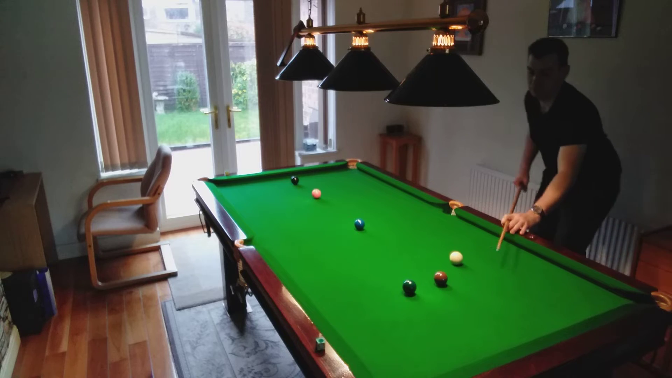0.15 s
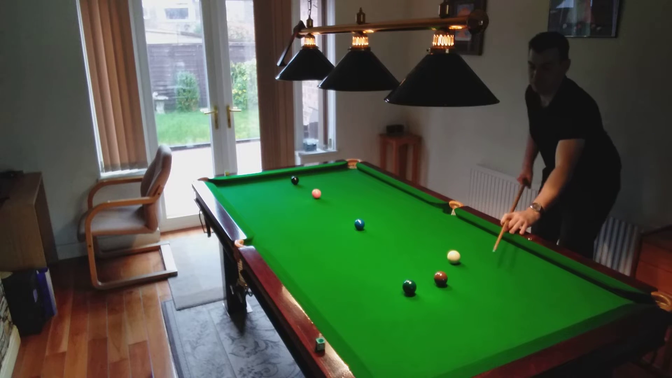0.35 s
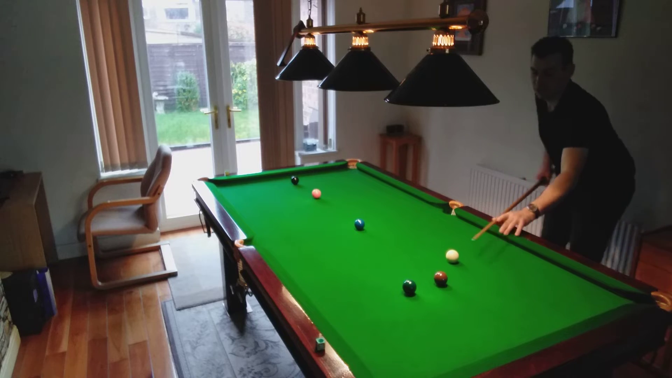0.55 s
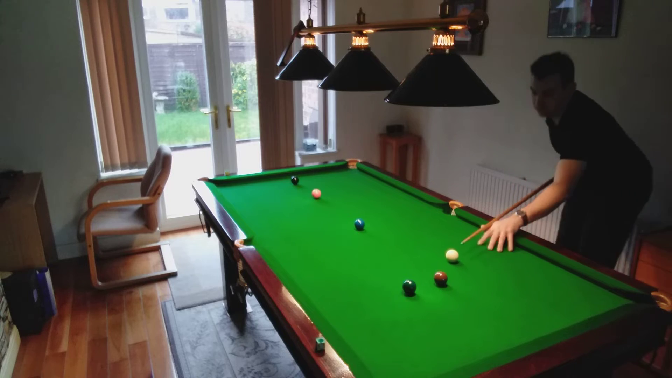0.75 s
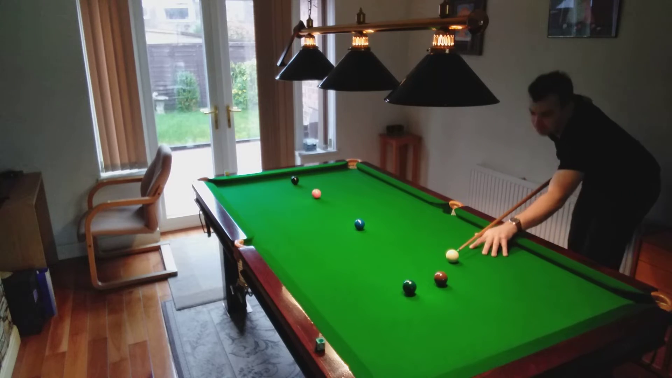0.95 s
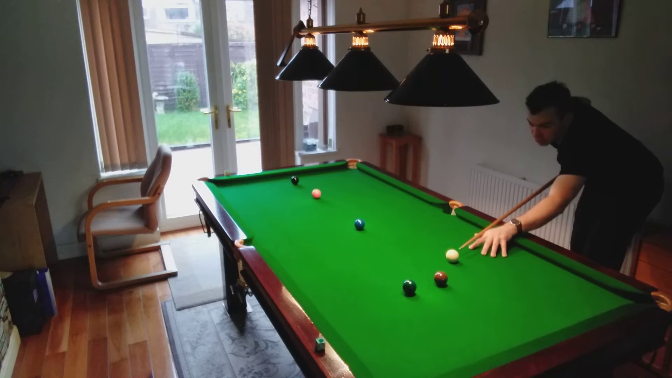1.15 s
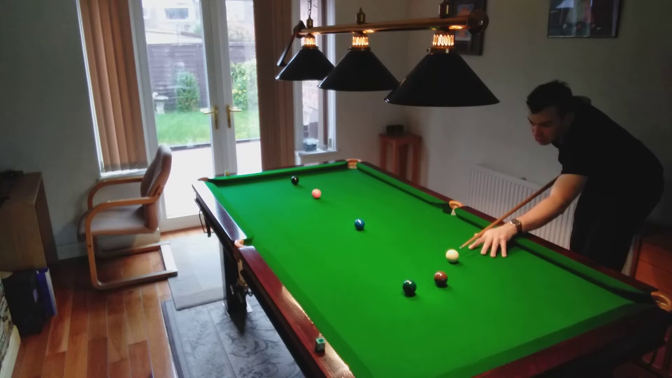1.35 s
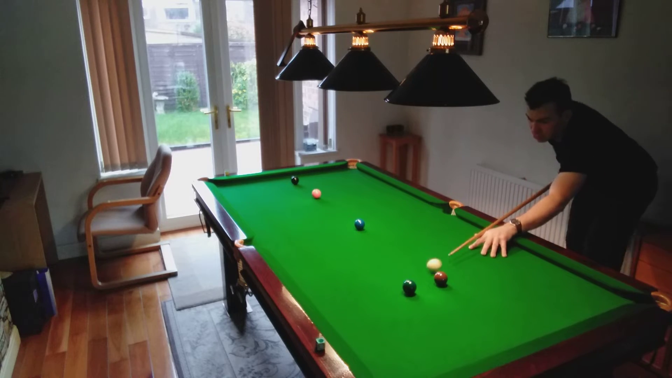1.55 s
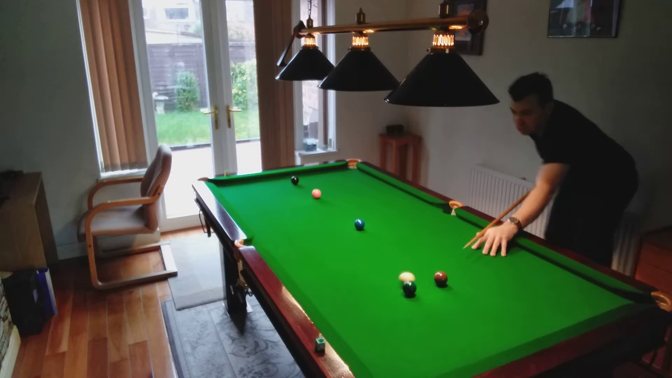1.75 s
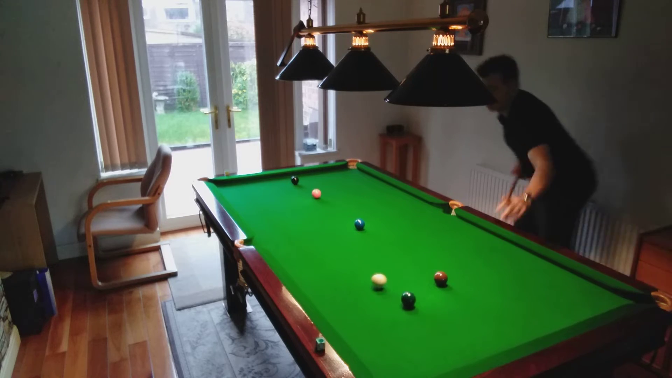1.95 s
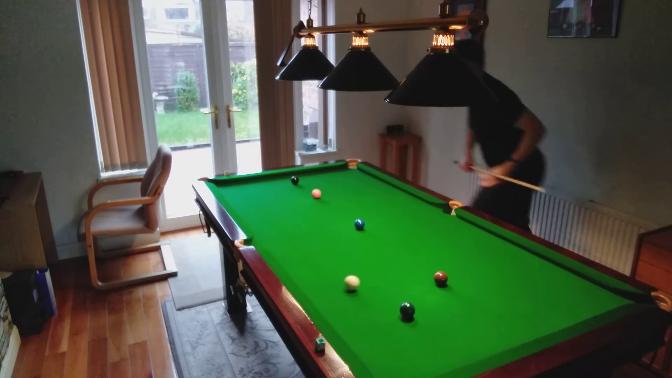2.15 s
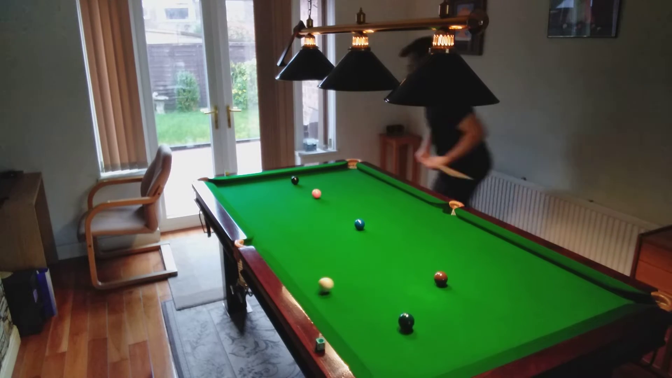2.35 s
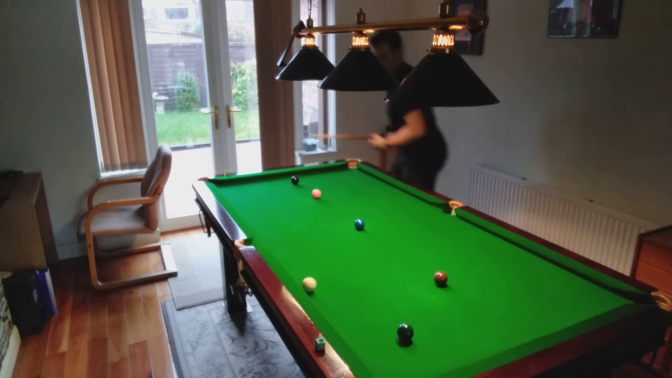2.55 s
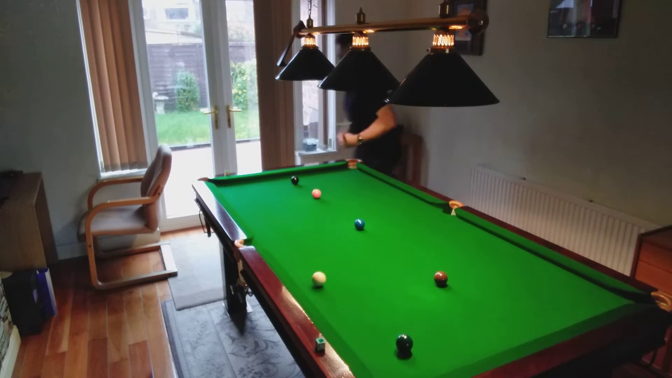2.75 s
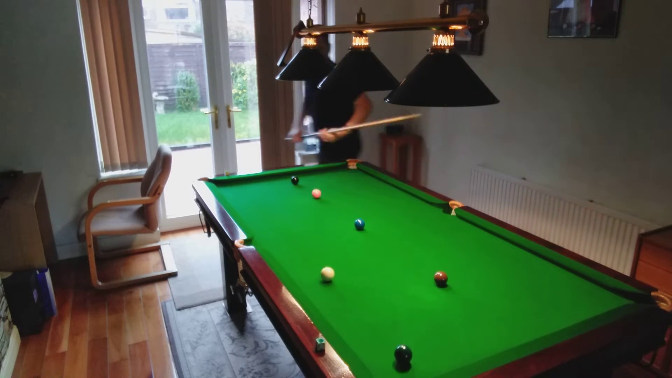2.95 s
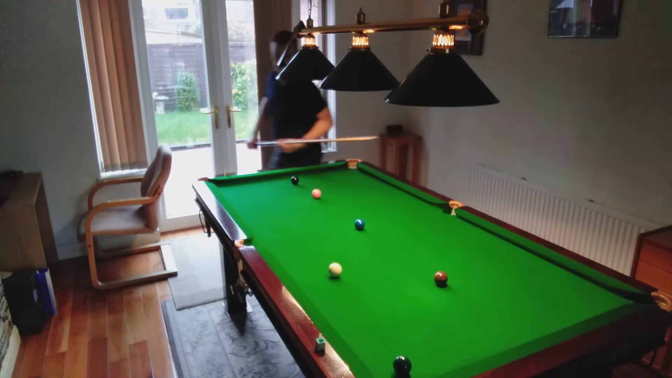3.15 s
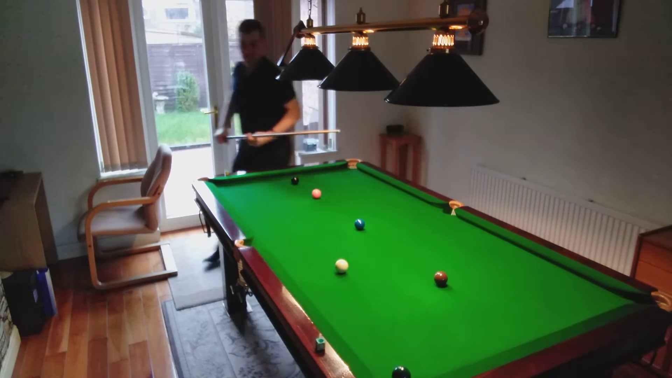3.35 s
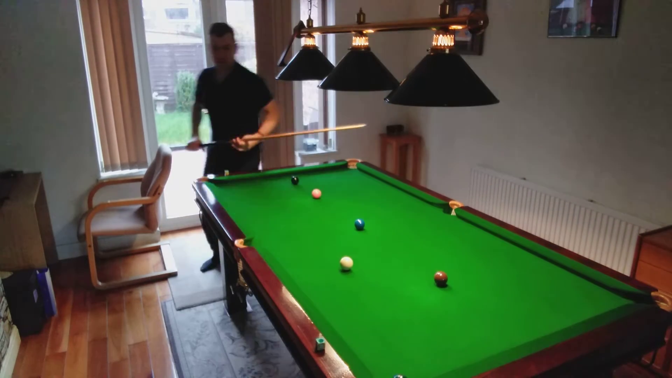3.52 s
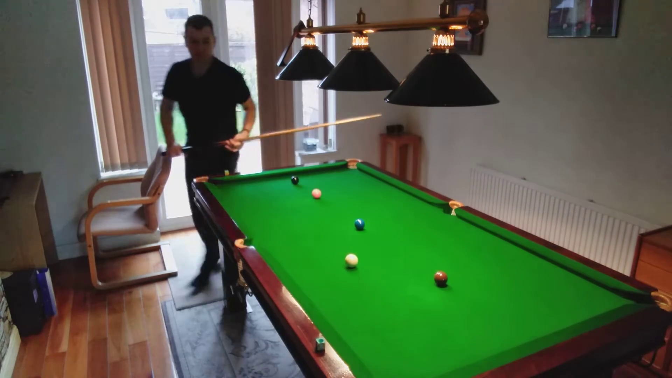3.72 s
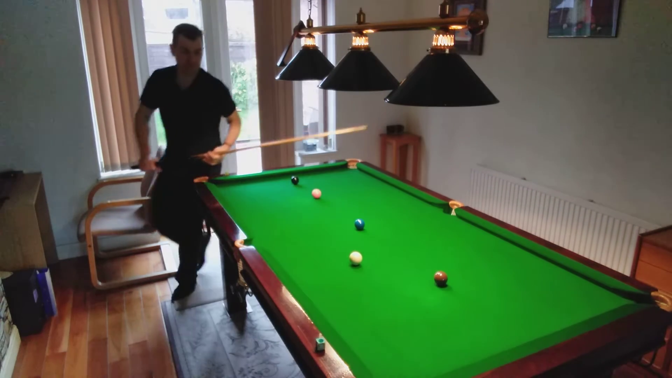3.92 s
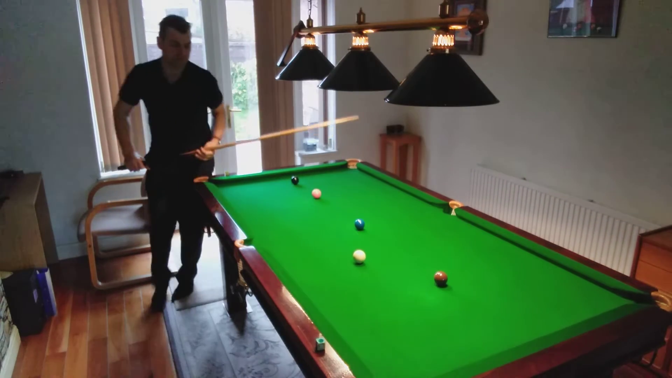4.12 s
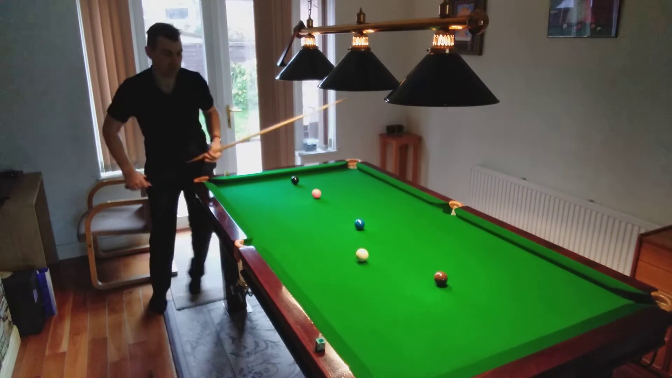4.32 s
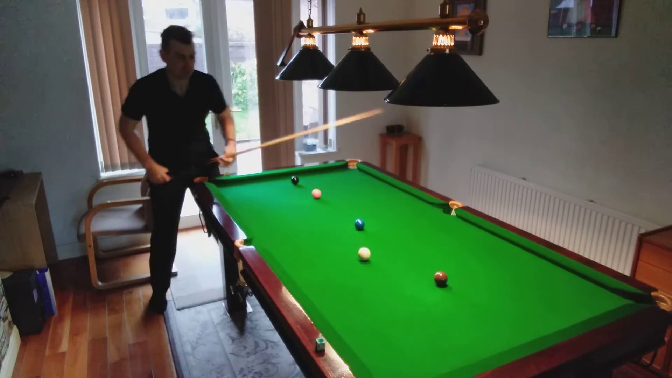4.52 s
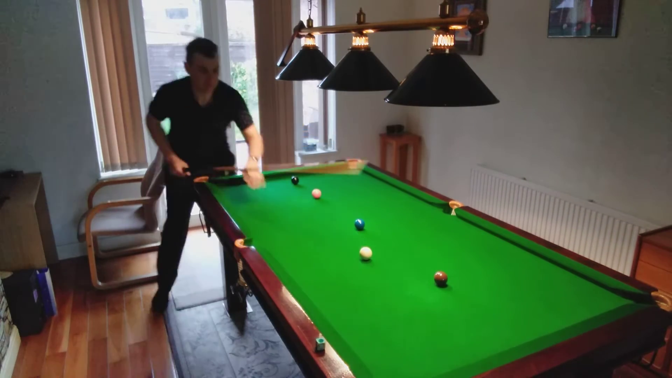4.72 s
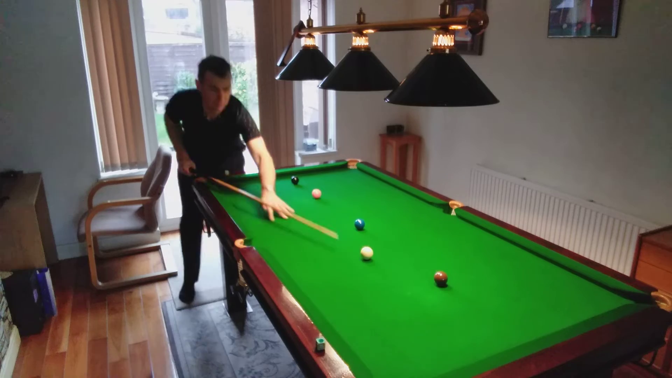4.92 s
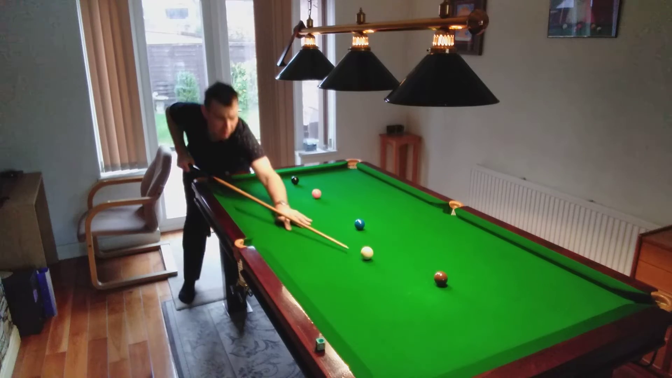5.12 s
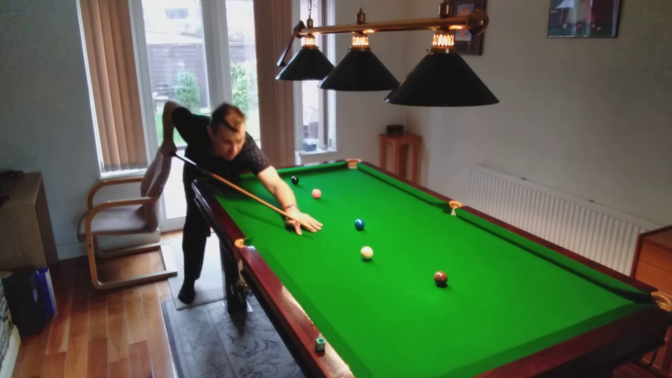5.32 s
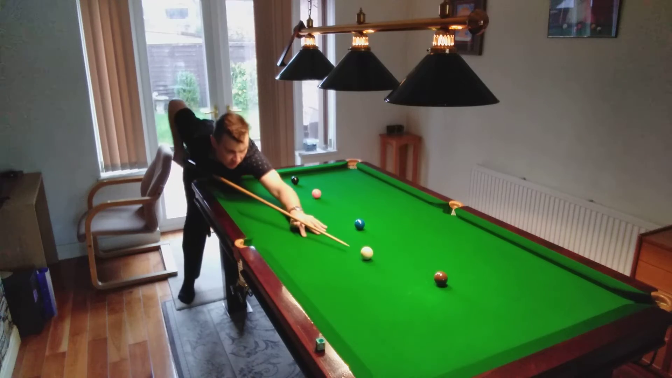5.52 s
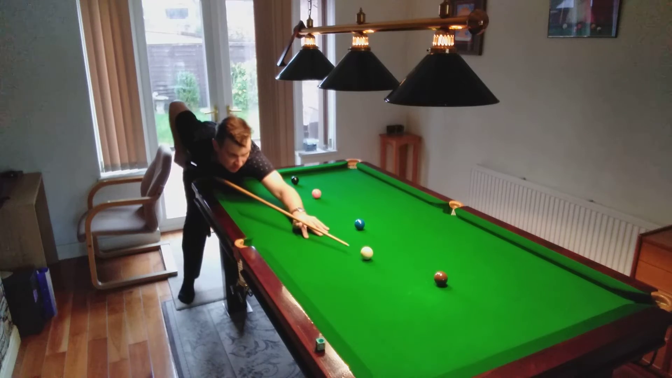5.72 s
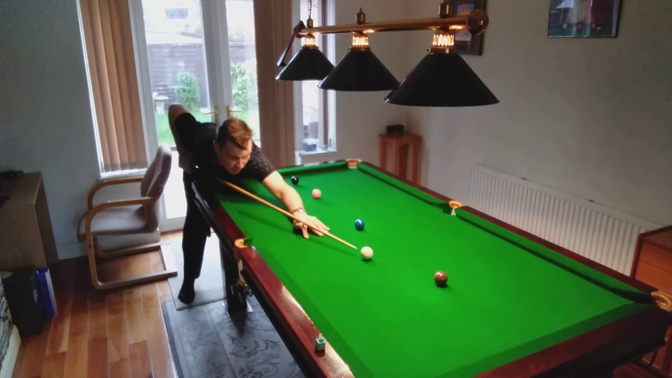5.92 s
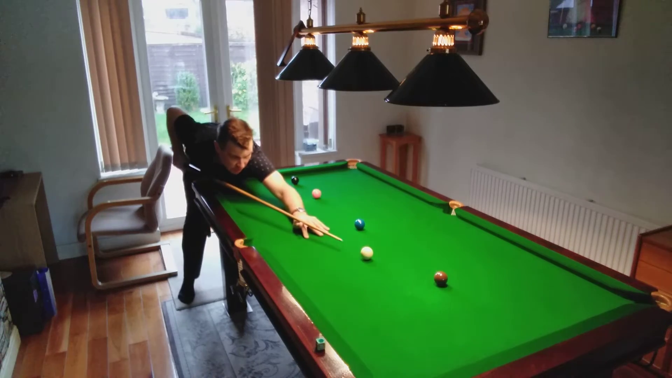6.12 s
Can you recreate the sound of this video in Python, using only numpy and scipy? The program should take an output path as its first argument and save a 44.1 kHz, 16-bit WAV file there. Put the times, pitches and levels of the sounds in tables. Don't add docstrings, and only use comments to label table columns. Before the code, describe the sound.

A ball rattles into a pocket, then a cue knock and a loud ball click, soft steps and cloth rustle, another pocket clatter, quiet room.

```python
import sys
import numpy as np
from scipy import signal
from scipy.fft import rfft, irfft
from scipy.io import wavfile

SR = 44100
rng = np.random.default_rng(int(sys.argv[2]) if len(sys.argv) > 2 else 0)


def decibels_to_gain(level_db):
    exponent = np.asarray(level_db, float) / 20
    return 10 ** exponent


def dump(signal):
    limited = np.clip(np.atleast_2d(signal).T, -1, 1)
    pcm = np.round(limited * 32767).astype(np.int16)
    wavfile.write(sys.argv[1], SR, pcm)


N = 272097

# f/Hz [Hz], density/dB [dB per Hz]
RUMBLE_SPECTRUM = [(20, -7), (40, -12), (60, -2), (100, -5), (160, -2.5), (220, -8.5), (300, -10.5),
                   (450, -24), (700, -43.5)]
# f/Hz [Hz], density/dB [dB per Hz]
CLOTHES_SPECTRUM = [(250, -38), (500, -4), (900, -6), (1400, -6.5), (2000, -6), (2800, -7), (4000, -32)]
# f/Hz [Hz], density/dB [dB per Hz]
HISS_SPECTRUM = [(1800, -10), (2800, -7), (4000, 2.5), (6000, 2), (8500, -7), (11000, 0.5), (16000, -9)]
# t/s [s], hold/s [s], level/dB [dB]
TREADS = [(.16, .05, -70), (.235, .15, -60), (.41, .05, -60), (.68, .04, -62), (.82, .12, -71),
          (1.49, .1, -48), (1.8, .07, -50), (2.0, .12, -67), (2.27, .15, -62), (2.56, .15, -60),
          (2.8, .13, -62), (3.03, .08, -63), (3.37, .2, -66), (3.68, .15, -67), (3.95, .04, -67),
          (4.17, .15, -54), (4.5, .07, -54), (4.74, .12, -70), (4.93, .12, -64), (5.18, .1, -69),
          (5.62, .06, -73), (6.05, .05, -71)]
# t/s [s], rise/s [s], hold/s [s], level/dB [dB]
CLOTHES_FOLDS = [(.14, .05, .05, -76), (.231, .01, .24, -64), (.67, .03, .14, -67), (.88, .05, .06, -76),
                 (1.47, .02, .02, -62), (1.85, .05, .03, -64), (2.1, .1, .15, -72), (2.4, .05, .06, -60),
                 (2.6, .1, .25, -74), (3.02, .08, .1, -71), (3.3, .15, .15, -75), (3.74, .08, .2, -75),
                 (4.17, .03, .14, -61), (4.52, .04, .04, -61), (4.75, .05, .1, -76), (4.92, .25, .09, -59),
                 (5.3, .1, .1, -70), (5.55, .05, .15, -80)]
# t/s [s], rise/s [s], hold/s [s], level/dB [dB], top re hiss/dB [dB]
CLOTH_STROKES = [(-.05, .02, .06, -66, 4), (.1, .05, .45, -75, -4), (.68, .05, .29, -61.5, 4),
                 (1.127, .005, .03, -76, -5), (1.16, .12, .08, -70.5, -1), (1.472, .025, .04, -64, -9),
                 (1.56, .1, .14, -73, -1), (1.8, .01, .06, -57, 0), (1.85, .1, .3, -63, 0),
                 (2.2, .1, .22, -62, -1), (2.48, .05, .2, -65.5, -1), (2.7, .1, .17, -64.5, -3),
                 (2.92, .14, .19, -63.5, -1), (3.25, .05, .36, -66.5, -3.5), (3.7, .05, .15, -75, -1),
                 (3.8, .17, .05, -65.5, -2), (4.0, .05, .15, -70, -1), (4.3, .05, .1, -66, -8),
                 (4.56, .05, .12, -69, -3), (4.68, .1, .15, -65.5, -2), (4.92, .05, .33, -53.5, 2.5),
                 (5.28, .05, .11, -57, 1), (5.45, .05, .2, -60.5, 1), (5.7, .03, .08, -66, 1)]
# t/s [s], hold/s [s], centre f/Hz [Hz], width/Hz [Hz], level/dB [dB]
SHAFT_SLIDES = [(.225, .05, 1145, 150, -66), (.46, .14, 700, 220, -66), (.755, .04, 1020, 300, -65),
                (.79, .1, 1480, 120, -72), (.92, .11, 795, 70, -76), (2.275, .08, 320, 120, -66),
                (3.05, .05, 1000, 200, -72), (3.43, .1, 1030, 320, -73), (4.96, .33, 1330, 300, -71)]
# delay/s [s], level/dB [dB]
ECHOES = [(.0011, -8), (.0018, -11), (.0043, -9), (.0121, -14), (.0166, -11), (.0203, -4), (.0247, -12)]
# f/Hz [Hz], t60/s [s], level/dB [dB]
ROOM_TAIL = [(90.5, 0.35, -23), (185, 0.45, -18), (337, 0.59, -16.5), (673, 0.44, -20.5), (1298, 0.47, -22),
             (3020, .45, -22), (6050, 0.35, -18), (11600, 0.28, -21)]
# f/Hz [Hz], level/dB [dB], t60/s [s]
ROOM_MODES = [(77.2, -47, 0.46), (161.1, -46, 0.35), (231.2, -38, 0.39), (265.5, -45.5, .45)]
# t/s [s], peak level/dB [dB], f/Hz [Hz]
DEEP_THUDS = [(0.269, -52.5, 148), (0.459, -49.5, 193), (0.707, -63, 81), (1.534, -41.5, 163),
              (1.831, -42, 159), (2.581, -43, 137), (2.699, -51, 139), (2.899, -52, 131), (3.418, -50, 122),
              (3.749, -65, 88.8), (4.27, -47, 153.4), (4.529, -48, 80), (4.965, -53, 141)]
# t/s [s], peak level/dB [dB], f/Hz [Hz]
BOXY_THUDS = [(0.257, -60, 248), (0.429, -44, 304), (0.692, -58, 266), (1.808, -37, 265), (2.296, -54, 197),
              (2.605, -63, 199), (2.718, -64, 267), (2.874, -55.5, 286), (3.068, -64, 208),
              (3.451, -68, 210), (3.956, -68, 196), (4.216, -43, 250.4), (4.27, -38.5, 238.6),
              (4.517, -50, 203), (4.967, -62, 213)]
# t/s [s], level/dB [dB]
CUE_HIT = (1.4692, -36)
# f/Hz [Hz], level/dB [dB], t60/s [s]
SHAFT_MODES = [(161, -10.5, 0.074), (236.8, -6, 0.16), (253.5, -7.5, 0.15), (380, -14, .04),
               (474, -11, 0.032), (570, -7.5, 0.047), (707, -11, 0.035), (890, -11, 0.026),
               (1061, -12, .06), (1350, -17, 0.061), (1629, -12.5, .12), (1990, -24, .06),
               (2314, -22.5, 0.054), (2600, -29.5, .05), (2980, -31, .05), (3270, -21.5, 0.045)]
# t/s [s], peak level/dB [dB], f/Hz of the contact pulse [Hz]
BALL_CLICKS = [
    (0.2322, -53, 1500),
    (1.1314, -72, 2600),
    (1.7971, -11.5, 2470),
    (2.4027, -34.5, 2560),
    (4.5158, -17.5, 2600),
]
# t/s [s], peak level/dB [dB], body level/dB [dB], top level/dB [dB]
POCKET_KNOCKS = [(.3298, -44, -8, -8), (0.3336, -34.5, -27, 3.5), (0.3422, -36, -18, 6),
                 (.3455, -39.5, -24, 3.5), (0.384, -28.5, -29, 4), (.398, -37.5, -24, -2),
                 (0.4093, -24, -10, 7), (0.4125, -20.5, -31, 9.5), (0.6733, -42, -7.5, -6.5),
                 (0.677, -29, -23, 7), (0.689, -33, -38, -3), (.716, -46.5, -21, 8),
                 (1.1295, -50, -26, -15.5), (1.809, -37, -28, 2.5), (2.404, -34.5, -12, -11),
                 (2.4100, -36, -10.5, -14.5), (4.1718, -33, -10, 10.5), (4.18, -31, -15, 3),
                 (4.194, -38, -14, 2), (4.2087, -33.5, -23, 9), (4.2431, -13.5, -14, 2.5),
                 (4.2503, -31.5, -28, 5), (4.519, -35.5, -34, -0.5), (4.524, -31, -6, 4.5),
                 (4.535, -33.5, -2.5, -3.5)]
# f/Hz [Hz], t60/s [s], level under the blow/dB [dB]
CORNER_TAIL = [(300, 0.54, -17), (1000, 0.35, 1), (2500, .4, -5), (4040, 0.34, -7.5), (7400, .33, -10.5),
               (11000, 0.28, -11), (16080, 0.32, -13)]
# f/Hz [Hz], width/Hz [Hz], level/dB [dB]
CAPSULE_PEAKS = [(8005, 670, 8.5), (15000, 1400, 6.5), (4544, 140, -1)]

TREAD_RISE_S, TREAD_FALL_DB_PER_S, RUMBLE_FLOOR_DB = .025, 100, -73.5
FOLD_FALL_DB_PER_S, CLOTHES_FLOOR_DB = 90, -82
STROKE_FALL_DB_PER_S, HISS_FLOOR_DB = 130, -83
SLIDE_RISE_S, SLIDE_FALL_DB_PER_S = .03, 150
CUE_ROOM_SHARE = .48
BURST_S, BURST_S_PER_DB = .0035, .00017
TOP_HZ = 15900


def rms_one(x):
    return x / np.sqrt(np.mean(x ** 2) + 1e-20)


def band(x, low_hz, high_hz):
    sections = signal.butter(2, [low_hz, min(high_hz, .45 * SR)], "band", fs=SR, output="sos")
    return signal.sosfilt(sections, x)


def add(out, s, piece):
    at = round(s * SR)
    out[at:at + len(piece)] += piece[:N - at]


def ring(x, hz, t60):
    radius = decibels_to_gain(-60 / (t60 * SR))
    angle = 2 * np.pi * hz / SR
    return signal.lfilter([0, np.sin(angle)], [1, -2 * radius * np.cos(angle), radius * radius], x + 1e-18)


def drift(rate):
    r = np.exp(-80 * np.pi * rate / SR)
    slow = signal.lfilter([1], [1, -2 * r, r * r], rng.standard_normal(N // 40 + 2002))[2000:]
    return np.interp(np.arange(N) / 40, np.arange(len(slow)), rms_one(slow))


def gestures(s, rise_s, hold_s, level_db, fall_db_per_s, floor_db):
    t = np.arange(0, N + 32, 32) / SR
    age = t[:, None] - s
    swell = np.clip(age / np.maximum(rise_s, .005), 0, 1) ** 2
    level = swell * decibels_to_gain(level_db - fall_db_per_s * np.maximum(age - rise_s - hold_s, 0))
    gain = np.sqrt(np.sum(level ** 2, axis=1) + decibels_to_gain(floor_db) ** 2)
    return np.interp(np.arange(N) / SR, t, gain)


def rustle(spectrum, patchy_db, rate):
    hz, db = np.transpose(spectrum)
    out, white, together = 0, rng.standard_normal((2, N)), drift(rate / 2)
    edges = hz[0] * 2 ** np.arange(0, np.log2(hz[-1] / hz[0]) + .3, 1 / 3)
    for k, (low, high) in enumerate(zip(edges, edges[1:])):
        level_db = np.interp(np.log(low * high) / 2, np.log(hz), db)
        flicker_db = patchy_db * (.6 * together + drift(rate))
        out = out + decibels_to_gain(level_db + flicker_db) * band(white[k % 2], low, high)
    return rms_one(out)


def treads():
    s, hold_s, db = np.transpose(TREADS)
    gain = gestures(s, TREAD_RISE_S, hold_s, db, TREAD_FALL_DB_PER_S, RUMBLE_FLOOR_DB)
    return gain * rustle(RUMBLE_SPECTRUM, patchy_db=1.8, rate=10.0)


def clothes():
    gain = gestures(*np.transpose(CLOTHES_FOLDS), FOLD_FALL_DB_PER_S, CLOTHES_FLOOR_DB)
    return gain * rustle(CLOTHES_SPECTRUM, patchy_db=1.3, rate=8.0)


def cloth_strokes():
    s, rise_s, hold_s, db, top_db = np.transpose(CLOTH_STROKES)
    hiss = rustle(HISS_SPECTRUM, patchy_db=.55, rate=12.0)
    top = signal.sosfiltfilt(signal.butter(4, 8800, "high", fs=SR, output="sos"), hiss)
    body = (hiss - top) * gestures(s, rise_s, hold_s, db, STROKE_FALL_DB_PER_S, HISS_FLOOR_DB)
    top = top * gestures(s, rise_s, hold_s, db + top_db, STROKE_FALL_DB_PER_S, HISS_FLOOR_DB + 4.0)
    return body + top


def shaft_slides():
    out, t = np.zeros(N), np.arange(N) / SR
    for s, hold_s, hz, width_hz, level_db in SHAFT_SLIDES:
        narrow = drift(width_hz) * np.cos(2 * np.pi * hz * t)
        narrow += drift(width_hz) * np.sin(2 * np.pi * hz * t)
        narrow *= decibels_to_gain(2.2 * drift(25.0))
        out += narrow * gestures(np.array([s]), SLIDE_RISE_S, hold_s, level_db, SLIDE_FALL_DB_PER_S, -150)
    return out


def movement():
    return treads() + clothes() + cloth_strokes() + shaft_slides()


def room(x):
    t = np.arange(round(.9 * SR)) / SR
    sparse = rng.random(len(t)) < np.clip(t / .08, .04, 1)
    white = rng.standard_normal(len(t)) * sparse / np.sqrt(np.clip(t / 0.11, .04, 1))
    answer = np.zeros(len(t))
    for hz, t60, level_db in ROOM_TAIL:
        answer += decibels_to_gain(level_db - 60 * t / t60) * band(white, hz / np.sqrt(2), hz * np.sqrt(2))
    answer *= 1 - np.exp(-t / 0.0045)
    answer[0] = 1
    for late_s, echo_db in ECHOES:
        answer[round(late_s * SR)] += decibels_to_gain(echo_db)
    return signal.fftconvolve(x, answer)[:N]


def standing(x):
    return sum(decibels_to_gain(db) * ring(x, hz, t60) for hz, db, t60 in ROOM_MODES)


def thuds():
    out = np.zeros(N)
    for s, peak_db, hz in DEEP_THUDS + BOXY_THUDS:
        cycles = np.arange(round(8 * SR / hz)) / SR * hz
        hump = cycles * np.exp(-cycles / .9)
        add(out, s, decibels_to_gain(peak_db - 1.5) * np.sin(2 * np.pi * cycles) * hump)
    return out


def cue():
    hit_s, hit_db = CUE_HIT
    t = np.arange(round(.15 * SR)) / SR
    push, scuff = np.zeros(N), np.zeros(N)
    add(push, hit_s, decibels_to_gain(hit_db) * np.hanning(7) / 3)
    judder = rng.standard_normal(len(t)) * t / 0.011 * np.exp(-t / 0.02)
    add(push, hit_s, decibels_to_gain(hit_db - 21.5) * judder)
    grip = 3.6
    shaft = 0
    for k, (hz, db, t60) in enumerate(SHAFT_MODES):
        shaft = shaft + (-1) ** k * decibels_to_gain(db) * ring(push, hz, min(t60, grip / np.sqrt(hz)))
    add(scuff, hit_s, rng.standard_normal(len(t)) * np.exp(-t / 0.007))
    shaft = shaft + decibels_to_gain(-34.5) * band(scuff, 210, 1300)
    shaft = shaft + decibels_to_gain(-48.5) * band(scuff, 1200, 3830)
    return shaft + decibels_to_gain(-54) * band(scuff, 3300, 5000)


def clicks():
    t = np.arange(-60, 61) / SR
    out = np.zeros(N)
    for s, peak_db, hz in BALL_CLICKS:
        pulse = -np.cos(2 * np.pi * hz * t + .3) * np.exp(-(t * hz / .62) ** 2)
        slate = np.sin(2 * np.pi * 0.53 * hz * t) * np.exp(-(t * hz / 0.94) ** 2)
        pulse += decibels_to_gain(-16) * slate
        tick = decibels_to_gain(-29.5) * band(rng.standard_normal(len(t)), 5600, 10000) * np.exp(-(t / 0.00037) ** 2)
        dull = signal.sosfiltfilt(signal.butter(6, 4700, fs=SR, output="sos"), pulse)
        add(out, s + t[0], decibels_to_gain(peak_db) * (dull + tick))
    return out


def rattle():
    s, peak_db, body_db, top_db = np.transpose(POCKET_KNOCKS)
    burst_s = np.maximum(BURST_S + BURST_S_PER_DB * (peak_db + 35), .0007)
    t = np.arange(round(.05 * SR)) / SR
    hz, t60, tail_db = np.transpose(CORNER_TAIL)
    grains = rng.standard_normal((2, N)) * decibels_to_gain(3.0 * np.minimum(rng.exponential(1, (2, N)), 3.5))
    white, out = rng.standard_normal((2, N)), np.zeros(N)
    edges = 300 * 2 ** np.arange(0, 6.1, .5)
    for k, (low, high) in enumerate(zip(edges, edges[1:])):
        mid = np.log(low * high) / 2
        body_share = np.interp(mid, np.log([2090, 3560, 8000, 10000]), [1, 0, 0, 0])
        top_share = np.interp(mid, np.log([8000, 10500]), [0, 1])
        levels = decibels_to_gain(peak_db + body_share * (body_db - 3.5) + top_share * top_db - 14)
        spray, energy = np.zeros(N), np.zeros(N)
        for when, level, length in zip(s, levels, burst_s):
            add(spray, when, level * (1 - np.exp(-t / .0003)) * np.exp(-t / length))
            add(energy, when, [level ** 2])
        fade = decibels_to_gain(-120 / (np.interp(mid, np.log(hz), t60) * SR))
        fill = np.exp(-1 / (0.0092 * SR))
        tail = signal.lfilter([1], [1, -fade], energy + 1e-18)
        tail = signal.lfilter([1 - fill], [1, -fill], tail)
        tail_gain = decibels_to_gain(np.interp(mid, np.log(hz), tail_db)) * np.sqrt(tail)
        out += spray * rms_one(band(grains[k % 2], low, high))
        out += tail_gain * rms_one(band(white[k % 2], low, high))
    return out


def scene():
    shaft = cue()
    blows = clicks() + thuds() + CUE_ROOM_SHARE * shaft
    direct_shaft = (1 - CUE_ROOM_SHARE) * shaft
    mono = movement() + room(blows) + standing(blows) + direct_shaft + rattle()
    return np.array([mono, mono])


def band_limit(x):
    return signal.sosfilt(signal.butter(12, 17010, fs=SR, output="sos"), x)


def record(dry):
    hz = np.fft.rfftfreq(N, 1 / SR)
    colour_db = sum(db / (1 + ((hz - at_hz) / width_hz) ** 2) for at_hz, width_hz, db in CAPSULE_PEAKS)
    colour_db = colour_db - 1.33 / (1 + np.exp(-(hz - 8700) / 150))
    low_cut = 1 + (50 / (hz + 1)) ** 5
    wet = irfft(rfft(dry) * decibels_to_gain(colour_db) * (hz < TOP_HZ) / low_cut, N)
    wet = .3 * np.tanh(wet / .3)
    apart = decibels_to_gain(-31) * band(np.abs(wet[0]) * rng.standard_normal(N), 3000, 14000)
    apart += decibels_to_gain(-39) * band(wet[0] * drift(30.0), 350, 1500)
    mix = wet + apart * [[1], [-1]]
    return band_limit(mix)


dry = scene()
out = record(dry)
dump(out)
```